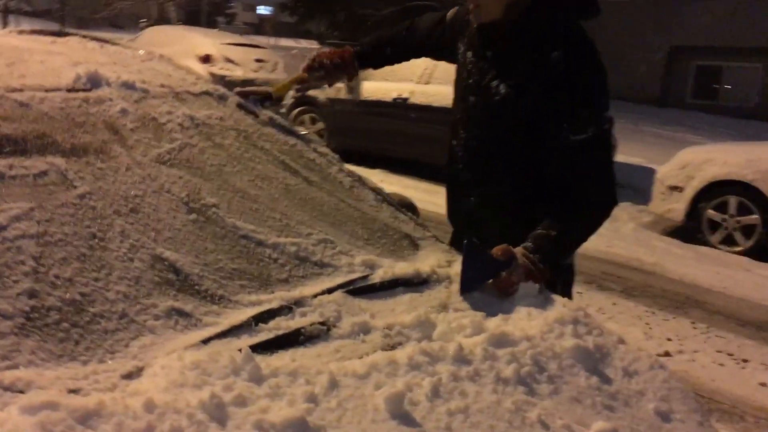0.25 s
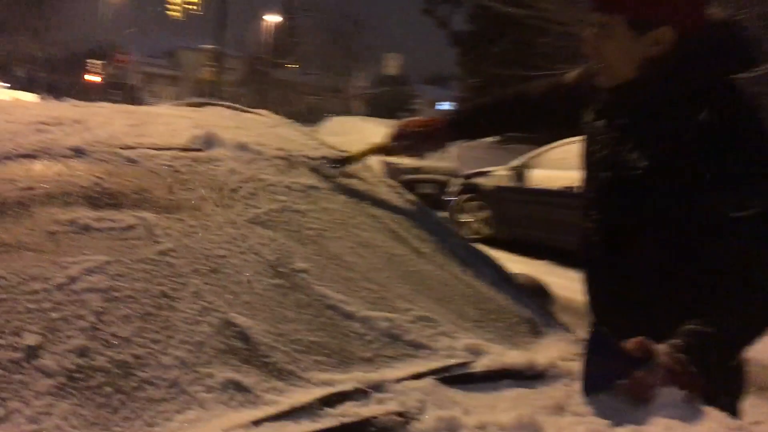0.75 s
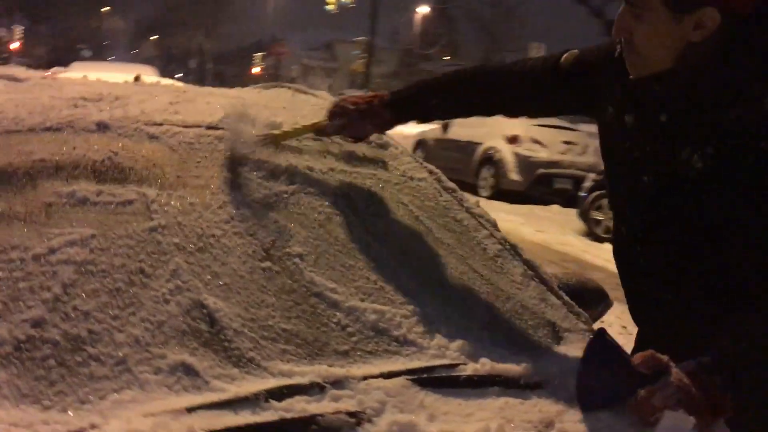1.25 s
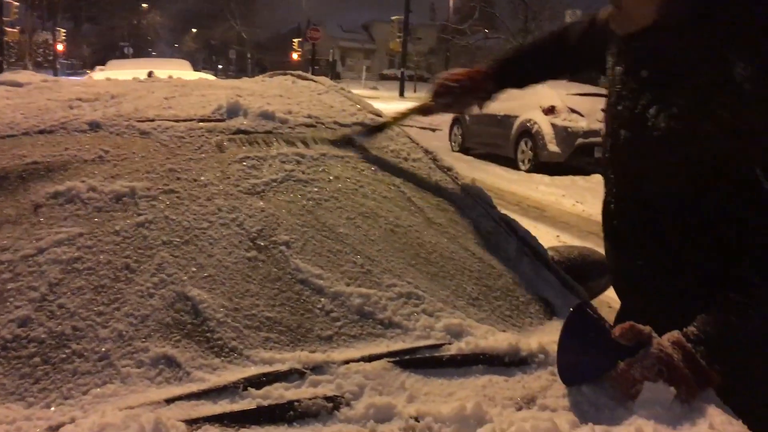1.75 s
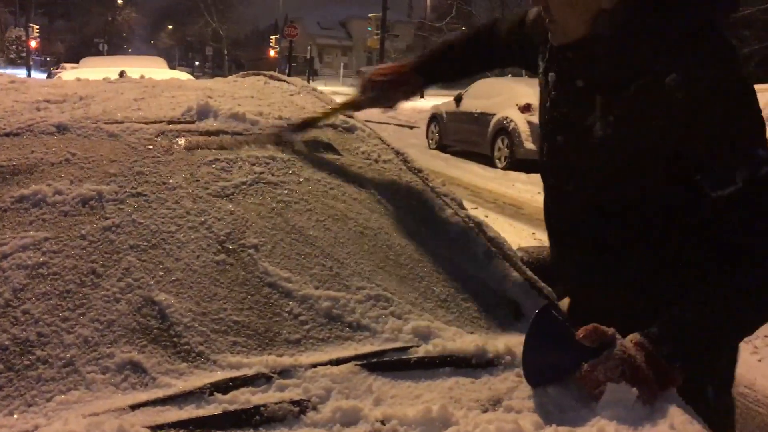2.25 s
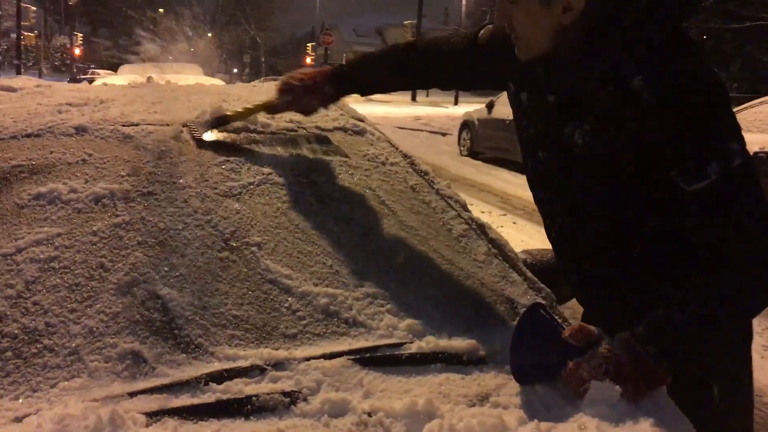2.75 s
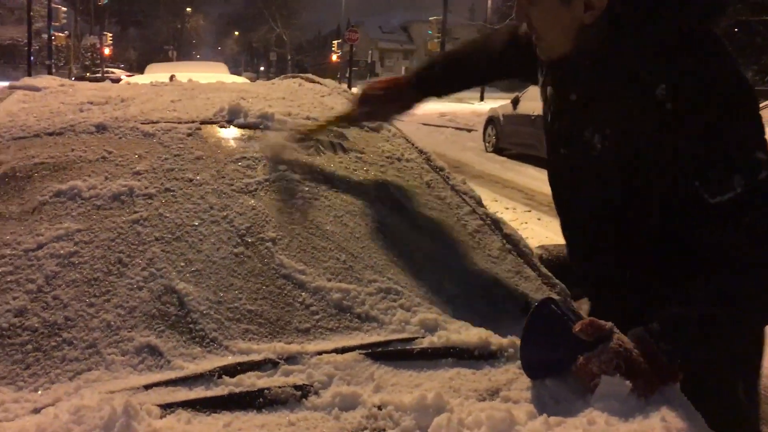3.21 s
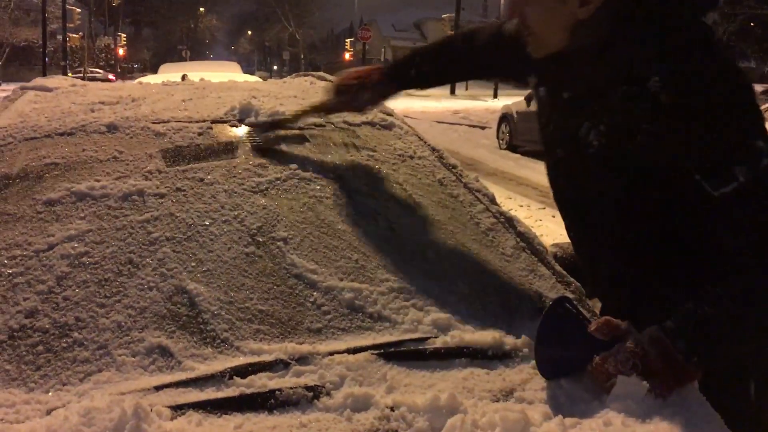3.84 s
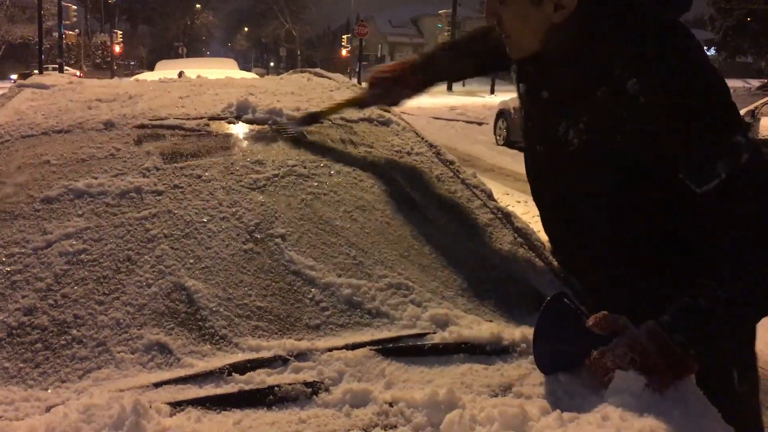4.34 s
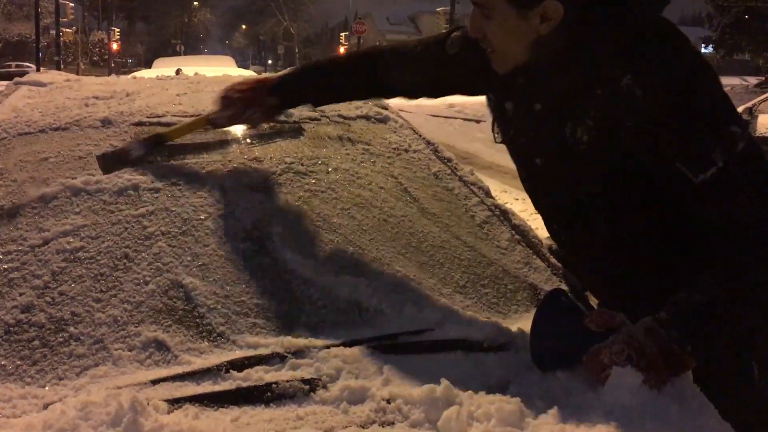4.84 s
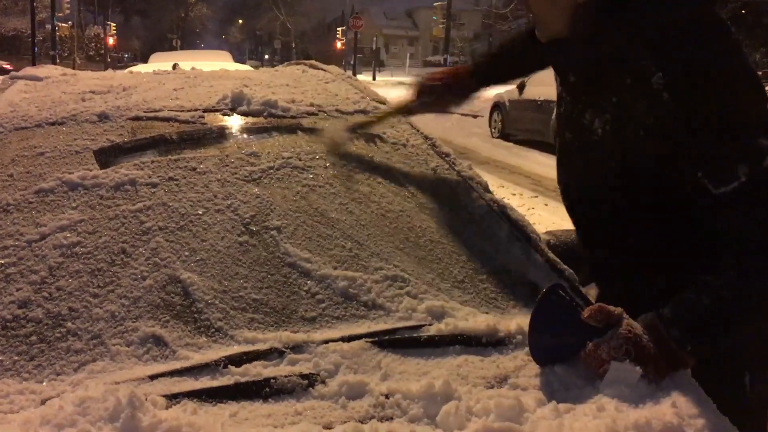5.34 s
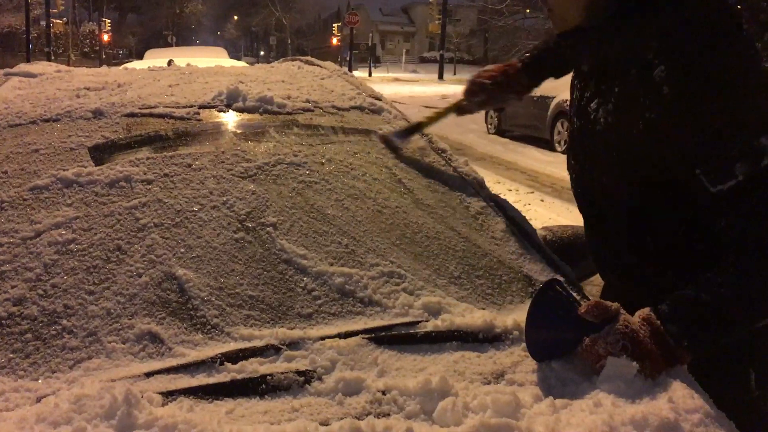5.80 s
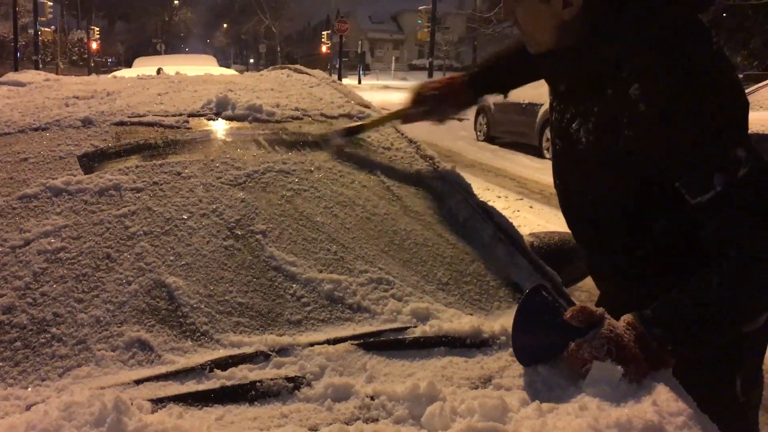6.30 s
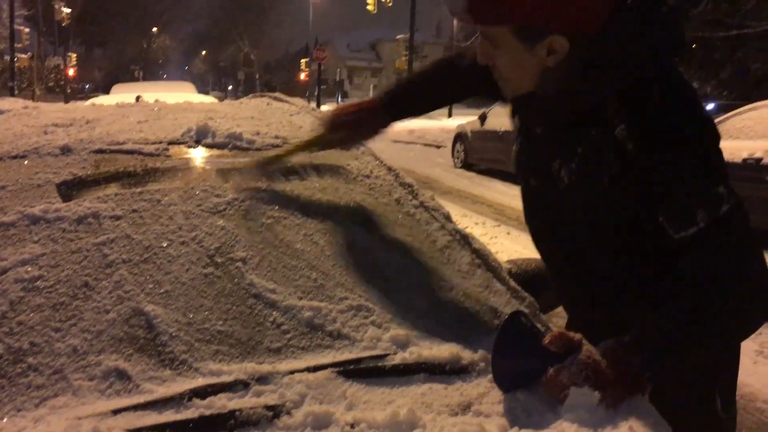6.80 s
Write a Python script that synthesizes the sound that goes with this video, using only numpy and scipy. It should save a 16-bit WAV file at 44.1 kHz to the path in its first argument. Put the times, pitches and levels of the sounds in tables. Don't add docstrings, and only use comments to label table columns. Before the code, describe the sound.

Rapid ice scraping heard by a microphone right beside the glass. An early hard knock leads into rough, crackling strokes with ringing ice chips and low thumps of the windscreen. Strokes grow more separate, with looser taps and near pauses as the blade skips back, followed by another dense run of crunches. The street is still, with slight dull echoes and a faint distant hum.

```python
import sys
import numpy as np
from scipy import signal
from scipy.fft import rfft, irfft
from scipy.io import wavfile
from scipy.ndimage import uniform_filter1d

SR = 44100
rng = np.random.default_rng(int(sys.argv[2]) if len(sys.argv) > 2 else 0)


def wav_out(sig):
    wavfile.write(sys.argv[1], SR, np.round(np.clip(np.atleast_2d(sig).T, -1, 1) * 32767).astype(np.int16))


def gain_from_db(level_db):
    decades = np.asarray(level_db, float) / 20
    return 10 ** decades


N = 311346
SLAM_S = 0.408


def rms_one(x):
    return x / np.sqrt(np.mean(x ** 2) + 1e-20)


def drift(rate):
    r = np.exp(-16 * np.pi * rate / SR)
    slow = signal.lfilter([1], [1, -2 * r, r * r], rng.standard_normal(N // 8 + 4002))[4000:]
    return np.interp(np.arange(N) / 8, np.arange(len(slow)), rms_one(slow))


def resonate(x, hz, width):
    r = np.exp(-np.pi * width / SR)
    gain = (1 - r * r) / 2
    return signal.lfilter([gain, 0, -gain], [1, -2 * r * np.cos(2 * np.pi * hz / SR), r * r], x)


def cracks(per_s, spread_db):
    sizes = gain_from_db(spread_db * np.minimum(rng.exponential(1, N), 4.0)) * rng.choice([-1, 1], N)
    return rms_one(sizes * (rng.random(N) < per_s / SR) + 1e-9)


def through(force, modes, wander_db, wander_rate, grain_db, tilt_db=0):
    middle = np.mean(np.log2([mode[0] for mode in modes]))
    rung = 0
    both = np.array([force, rng.standard_normal(N)])
    for k, (hz, width, db) in enumerate(modes):
        swell_db = wander_db * drift(wander_rate) + grain_db * drift(50.6)
        swell_db = swell_db + tilt_db * (np.log2(hz) - middle)
        rung = rung + (-1) ** k * resonate(both * gain_from_db(db + swell_db), hz, width)
    return rung[0] / np.std(rung[1])


def in_time(rows):
    s, *columns = np.transpose(rows)
    return [np.interp(np.arange(N) / SR, s, c) for c in columns]


def grip():
    # start in seconds, length in seconds, crush at full speed in dB,
    # place of full speed from 0 to 1, sharpness of the top in dB.
    strokes = [(-.03, 0.26, -27, 0.59, -2.5), (0.405, 0.28, -25.5, 0, -1.5), (0.679, 0.29, -27, 0.23, -5),
               (0.966, 0.11, -26.5, 0.83, -2.5), (1.064, 0.3, -23.5, 0.13, -1),
               (1.406, 0.25, -25.5, 0.38, -3.5), (1.825, 0.12, -26.5, 0.4, -2), (1.954, 0.12, -27, 0.58, 2),
               (2.082, 0.26, -27, 0.45, 0), (2.53, 0.075, -29, 0.8, 3), (2.602, 0.13, -20.5, 0.3, -2),
               (2.919, 0.076, -43, 0.13, 3.5), (3.119, 0.23, -24.5, 0.68, -1), (3.929, .16, -21, 0.37, 0),
               (4.195, 0.053, -36.5, 0.68, 9.5), (4.915, 0.049, -31, 1, 5), (5.245, 0.23, -24, 0.39, -3.5),
               (5.524, 0.32, -26.5, 0.26, -3), (5.834, 0.17, -34.5, 0, -0.5),
               (5.97, 0.093, -28.5, 0.89, -9), (6.081, 0.2, -27.5, 0.78, -7),
               (6.286, 0.21, -33.5, 0.77, -6.5), (6.506, 0.22, -28.5, 0.5, -7.5),
               (6.716, 0.18, -25, 0.8, -3.5)]
    # start in seconds, length in seconds, crush in dB, sharpness in dB.
    glides = [(0.229, 0.085, -35.5, -9), (0.298, 0.11, -34.5, -4.5), (1.659, 0.045, -37.5, -10),
              (1.721, 0.16, -40.5, -7), (2.352, 0.078, -33.5, -9), (2.732, 0.26, -50.5, -5),
              (6.877, 0.087, -52, -10), (2.952, 0.24, -49, -16), (3.32, 0.12, -43.5, 2),
              (3.545, 0.21, -54, 3), (3.722, 0.7, -53.5, 0), (4.123, 0.14, -45.5, 5),
              (4.569, 0.022, -29.5, -6), (4.646, 0.073, -43.5, 7), (4.697, 0.07, -54, 0),
              (4.847, 0.059, -50, 5), (5.137, 0.1, -36, 1.5), (5.452, 0.078, -35.5, -14)]
    crush_power, dull_when_slow = 0.98, 0.23
    t = np.arange(N) / SR
    power = np.full((2, N), 1e-12)
    moves = [*strokes, *[(s, d, db, .5, sharp) for s, d, db, sharp in glides]]
    for start, length, db, place, sharp_db in moves:
        span = slice(max(round(start * SR), 0), round((start + length) * SR))
        corners_s = start + length * np.array([0, np.clip(place, .05, .95), 1])
        way = np.interp(t[span], corners_s, [0, .5, 1])
        body = np.sin(np.pi * way).clip(0) ** crush_power
        edge = gain_from_db(sharp_db) * body ** (1 + dull_when_slow)
        power[:, span] += (gain_from_db(db) * np.array([body, edge])) ** 2
    return np.sqrt(power)


def contacts():
    # start in seconds, peak in dB, sharpness in dB, length in ms.
    skips = [(3.3874, -18, 1.5, 13.8), (3.4356, -29, -23, 26), (3.5325, -26.5, -15, 11),
             (3.5478, -32, 0, 7.5), (3.5738, -18.5, -13, 13), (3.596, -22, 0, 4.9), (3.6025, -35, -3, 6),
             (3.6215, -16, -6, 7.9), (3.627, -14.5, -10, 5.8), (3.641, -27.5, -2.5, 22),
             (3.674, -19, -13, 21), (3.689, -19.5, -6, 9.7), (3.719, -29, -6, 19), (3.7613, -36, -22, 11),
             (3.7943, -28.5, -16, 29), (3.842, -33, 3, 11), (3.8512, -24, -15, 15), (4.13, -24, -18, 4.1),
             (4.1347, -27.5, 3.5, 12.5), (4.2164, -15, -15, 26), (4.4153, -21, -11.5, 7.4),
             (4.4663, -32, -8, 30), (4.5318, -15.5, -16, 14.7), (4.581, -12.5, -11, 15),
             (4.6637, -15, -10, 13.3), (4.6976, -19, -5, 18), (4.8625, -25, -10, 19),
             (4.8754, -19.5, -15, 6), (5.0472, -16.5, -9.5, 8.3), (5.075, -13.5, -11.5, 10.4),
             (5.1073, -20, -10, 14), (5.1312, -32, -2, 7.3)]
    # start in seconds, peak in dB, sharpness in dB.
    nicks = [(0.34, -8.5, -17), (0.351, -17, -14), (0.378, -21, -13), (0.3944, -18, 1), (0.41, -3, -6),
             (0.6541, -14.5, -18), (0.6731, -12.5, -10.5), (0.7, -15.5, -28), (0.9815, -23, -7),
             (1.0046, -6.5, -8), (1.434, -19.5, 0), (1.758, -17.5, -11.5), (1.796, -19.5, -11),
             (2.092, -30, -6), (2.108, -10, -9.5), (2.3407, -14, -4), (2.457, -33, -6), (2.4753, -21, -7),
             (2.4966, -30, -8), (2.5435, -8, -8), (2.7335, -16, -10), (2.9124, -39, 2), (2.937, -17, -2),
             (3.0346, -21.5, -23), (3.048, -25, -16), (3.075, -34, -14), (3.1183, -21, -21),
             (3.1323, -15.5, -8), (3.938, -20.5, 5), (4.9163, -24.5, 1), (5.146, -16, -10)]
    # start in seconds, peak in dB, sharpness in dB.
    ridges = [(0.479, -13, -7), (0.5963, -13.5, -11), (0.762, -11, -26), (1.0234, -9, -2.5),
              (1.081, -15, 0), (1.1526, -14, -20), (1.248, -5.5, -6), (1.2925, -9.5, -2.5),
              (1.333, -22, -7), (1.8539, -8.5, -6.5), (2.006, -13.5, -1), (2.308, -9.5, -14),
              (2.552, -10.5, 1), (2.582, -16, -1), (2.6102, -6, -6), (2.9455, -7, -12.5),
              (3.181, -12, -0.5), (3.2255, -7, -5), (3.9548, -20, 11), (4.94, -8.5, -2), (5.176, -18, -14),
              (5.2724, -9, -8.5), (5.701, -9.5, -7), (5.7823, -12, -23), (5.854, -6, -15),
              (6.3273, -17, -20), (6.373, -18, -18), (6.403, -10.5, -21), (6.871, -11.5, -4),
              (5.922, -24, -3), (5.941, -24, -6), (6.339, -19, -17)]
    # start in seconds, peak in dB, sharpness in dB.
    snaps = [
        (1.498, -11.5, -18),
        (2.283, -2.5, -12),
        (2.377, -7, -15),
        (5.649, -5.5, -7),
    ]
    # start in seconds, peak in dB, sharpness in dB.
    catches = [(0.051, -15.5, -22), (0.08, -10.5, -14), (0.12, -19, -1), (0.135, -14.5, -7),
               (0.182, -14.5, -19), (0.451, -13, -15), (0.505, -26, -16), (0.527, -14, -21),
               (0.546, -11, -11), (0.558, -11.5, -4), (0.574, -14, -8), (0.797, -11.5, -17),
               (0.86, -11, -21), (0.879, -14, -12), (0.912, -25, -6), (1.051, -15, -7), (1.133, -6, -4.5),
               (1.179, -5.5, -6.5), (1.209, -16, -7.0), (1.231, -12.5, -6.0), (1.27, -16.5, 2),
               (1.472, -23, -24), (1.526, -21.5, 5), (1.569, -12.5, -27), (1.648, -24, -24),
               (1.682, -36, -21), (1.875, -17, -4), (1.893, -13.5, -18), (1.914, -13.5, -18),
               (1.923, -12, -11), (1.943, -14.5, -8), (1.954, -17, -13.0), (1.968, -14, -6.5),
               (1.986, -21, 1), (2.012, -11.5, -8), (2.145, -23, 5), (2.234, -10.5, -4), (2.3, -7.5, -10.5),
               (2.402, -32, -2), (2.514, -36, -2), (2.633, -11.5, -1), (2.677, -7.5, -4), (2.814, -41, 1),
               (3.093, -33, -11), (3.155, -13, -12), (3.2, -23, -6.0), (3.209, -13, -5), (3.236, -3, -5),
               (3.261, -8.5, -4), (3.296, -22, -11), (3.305, -6.5, -8), (3.345, -21.5, -12),
               (3.376, -23, -12), (3.465, -39, -25), (3.562, -40, -7), (3.613, -39, 5)]
    # start in seconds, peak in dB, sharpness in dB.
    late_catches = [(3.988, -16, 5), (4.018, -14, -11), (4.042, -9, -15), (4.079, -33, -19.0),
                    (4.146, -24, -16), (4.608, -38, -9), (4.649, -31, -9), (4.69, -27.0, 2),
                    (5.001, -34, -9), (5.155, -25.5, -2), (5.211, -22, -15.0), (5.304, -11, -4),
                    (5.325, -20, 5), (5.363, -14, 0.5), (5.379, -16.5, 3), (5.386, -13, -6),
                    (5.395, -7, -9), (5.424, -14.5, -6), (5.487, -21, -8), (5.544, -23, -26),
                    (5.598, -13, -23), (5.613, -20.5, -1), (5.623, -9, -3), (5.635, -14, -3),
                    (5.727, -14.5, -4), (5.667, -13, -4), (5.676, -19, 0), (5.712, -13.5, -8),
                    (5.737, -10.5, -6), (5.775, -13.5, -11), (5.868, -15, -14.0), (5.892, -13, -4),
                    (5.908, -14, -6), (5.958, -27.5, 0), (5.983, -17, -13), (6, -16.5, -8), (6.012, -14, 1),
                    (6.034, -9.5, -7), (6.11, -29, -2), (6.13, -14, -8.5), (6.155, -15.5, -23),
                    (6.183, -13.5, -27), (6.22, -12, -22), (6.24, -12, -20), (6.305, -17, -15),
                    (6.418, -15.5, 0.5), (6.44, -13.5, -13), (6.549, -20, -13), (6.579, -21, -15),
                    (6.622, -11, -32), (6.733, -19, -5), (6.76, -26, -9), (6.777, -22, -13),
                    (6.787, -12, -8), (6.812, -10.5, -7), (6.844, -7.5, -9)]
    rows = list(skips)
    for table, length_ms in [(nicks, 9.9), (ridges, 16), (snaps, 6.1), (catches, 11.2), (late_catches, 11.2)]:
        rows += [(*row, length_ms) for row in table]
    return rows


def bites(rows):
    out = np.zeros((2, N + 2000))
    t_ms = np.arange(2000) / SR * 1000
    for s, peak_db, sharp_db, ms in rows:
        shape = np.sin(np.pi * np.clip(t_ms / max(ms, 1), 0, 1) ** 0.39) ** 1.8
        i = max(round((s - .0018) * SR), 0)
        out[:, i:i + 2000] += gain_from_db([[peak_db - 11.5], [peak_db + sharp_db - 6.5]]) * shape
    return out[:, :N]


def stick():
    stick_ms, from_db, db_per_db = 3.2, -36, 0.06
    loss_db = np.zeros(N)
    pause = np.hanning(round(stick_ms * SR / 1000))
    for s, peak_db, *_ in contacts():
        i = round(s * SR) - len(pause)
        loss_db[i:i + len(pause)] += db_per_db * max(peak_db - from_db, 0) * pause
    return gain_from_db(-loss_db)


def forces(crush):
    trickle_db, fall_db_per_s, trickle_sharp_db = -23, 38, 4
    treble_fall = 4.5
    chatter_db = 27
    crush_db = 20 * np.log10(crush[0])
    fall = fall_db_per_s * np.arange(N) / SR * [[1], [treble_fall]]
    held_db = np.maximum.accumulate(crush_db + fall, axis=1) - fall
    trickle = gain_from_db(held_db + trickle_db) * gain_from_db([[0], [trickle_sharp_db]])
    slip = gain_from_db(1.07 * drift(77) + 2.35 * drift(160) - 2.5)
    chatter = gain_from_db(chatter_db * thumps())
    return np.hypot(bites(contacts()), slip * np.hypot(stick() * chatter * crush, trickle))


def cores():
    core_db, core_sharp_db, place = 0.5, 7.5, .15
    out = np.zeros((2, N))
    for s, peak_db, sharp_db, ms in contacts():
        i = round((s + place * ms / 1000) * SR)
        out[:, i] = gain_from_db([peak_db + core_db, peak_db + sharp_db + core_sharp_db])
    return out


def scrape(body_force, edge_force, tilt_db):
    # frequency in Hz, width in Hz, level in dB.
    body_modes = [(888, 346, -3), (1300, 350, -0.5), (1640, 484, 0.5), (2410, 385, -1), (3254, 660, 0),
                  (4150, 600, 1.5)]
    # frequency in Hz, width in Hz, level in dB.
    edge_modes = [(5100, 1400, -1.5), (5760, 6200, -0.5), (7670, 5850, 4), (9540, 390, 2.5),
                  (11830, 1960, 3.5), (12720, 2440, 4), (14500, 950, 1.5), (16440, 690, 1.5)]
    ice = cracks(per_s=15000, spread_db=4.5)
    body_core, edge_core = cores()
    body = through(ice * body_force + body_core, body_modes, wander_db=2.1, wander_rate=25.0, grain_db=2.5,
                   tilt_db=2.0 * tilt_db)
    edge = through(ice * edge_force + edge_core, edge_modes, wander_db=1.0, wander_rate=29.0, grain_db=1.5)
    splinters = cracks(per_s=6000, spread_db=11.0) * np.sqrt(body_force * edge_force)
    bare = signal.sosfilt(signal.butter(1, [1100, 9000], "band", fs=SR, output="sos"), splinters)
    return gain_from_db(-1.0) * body + edge + gain_from_db(-3.5) * bare


def sings(force):
    # start in seconds, length in seconds, pitch in Hz, level over the crush in dB.
    steady = [(0.731, 0.12, 1420, 20), (2.565, 0.04, 1880, 23), (3.609, 0.032, 2020, 22.5),
              (5.163, 0.069, 1330, 23.5), (5.558, 0.091, 1430, 18), (5.58, 0.12, 3100, 14.5),
              (0.042, 0.092, 803, 16.5), (0.451, 0.057, 630, 19), (0.546, 0.09, 792, 23.5),
              (1.05, 0.057, 1670, 16), (1.22, 0.13, 4360, 15), (1.48, 0.13, 3080, 14.5),
              (2.174, 0.14, 4570, 12.5), (2.626, 0.048, 1130, 18), (2.577, .12, 4150, 17),
              (3.158, 0.08, 4140, 15.5), (3.175, 0.12, 820, 8), (3.95, 0.062, 4250, 13.5),
              (3.952, 0.079, 1130, 12), (4.928, 0.028, 1100, 9), (5.6, 0.09, 7300, 12.5),
              (6.394, 0.016, 1620, 19), (2.6, 0.045, 2200, 17.5), (6.835, 0.035, 2350, 13),
              (0.671, 0.018, 3820, 18), (0.383, 0.024, 3480, 28), (4.527, .03, 1740, 19),
              (5.035, .025, 1490, 22), (5.094, 0.035, 1300, 23)]
    # start and length in seconds, first and last pitch in Hz, level over the crush in dB.
    climbs = [
        (0.368, 0.24, 3560, 4130, 15.5),
        (0.862, 0.16, 1230, 1430, 19),
        (0.984, 0.22, 3100, 4200, 14.5),
    ]
    rings = [(s, d, hz, hz, db, 0.061) for s, d, hz, db in steady]
    rings += [(*row, 0.13) for row in climbs]
    ice = cracks(per_s=5000, spread_db=3.5) * force
    t, out = np.arange(N) / SR, 0
    for start, length, from_hz, to_hz, db, share in rings:
        way = np.clip((t - start) / length, 0, 1)
        turn = np.exp(2j * np.pi * np.cumsum(from_hz + (to_hz - from_hz) * way) / SR)
        r = np.exp(-np.pi * share * from_hz / SR)
        push = gain_from_db(db) * np.sin(np.pi * way) * ice
        out = out + 2 * np.real(turn * signal.lfilter([1 - r], [1, -r], push / turn + 1e-18))
    return out


def chips(force):
    ice = cracks(per_s=1800, spread_db=3.5) * force
    dealt = rng.integers(0, 24, N)
    pitches = np.geomspace(1300, 9000, num=24)
    rung = sum(resonate(ice * (dealt == k) + 1e-18, hz, 0.026 * hz) for k, hz in enumerate(pitches))
    return gain_from_db(11.5) * rung


def flakes(force, tilt_db):
    modes = [(hz, 0.026 * hz, 0) for hz in np.geomspace(821, 5290, num=14)]
    ice = cracks(per_s=6000, spread_db=6.0) * force
    return gain_from_db(-13.5) * through(ice, modes, wander_db=0.5, wander_rate=4.3, grain_db=6.0, tilt_db=0.35 * tilt_db)


def slide():
    from_hz, hz_per_s, length_s, width_hz = 570, 1300, .21, 57
    t = np.clip(np.arange(N) / SR - SLAM_S, 0, length_s)
    rough = drift(width_hz) * np.sin(np.pi * t / length_s) ** 0.25
    return gain_from_db(-41) * rough * np.sin(2 * np.pi * (from_hz * t + hz_per_s * t ** 2 / 2))


def thumps():
    # start in seconds, peak in dB, pitch in Hz, time to fall by 60
    # dB in seconds.
    knocks = [(0.112, -28, 66, 0.31), (5.62, -31, 66, 0.27), (0.419, -13, 131, 0.058),
              (0.723, -19, 114, 0.088), (1.314, -15, 114, 0.11), (1.443, -19.5, 111.6, 0.29),
              (2.028, -19, 128, 0.22), (5.43, -17, 108, 0.14), (5.35, -29, 308, 0.12),
              (5.326, -17, 164, 0.1), (5.373, -14, 197, 0.088), (2.115, -14.5, 114, 0.12),
              (2.165, -20.5, 120.8, 0.33), (2.24, -15, 110, 0.15), (2.704, -15, 131.3, 0.15),
              (2.945, -18.5, 114, 0.12), (3.163, -25, 158, 0.11), (3.234, -26.5, 115, 0.52),
              (3.63, -18, 121, 0.072), (3.97, -29, 140, 0.36), (4.231, -10.5, 112, 0.071),
              (4.591, -12, 119, 0.094), (4.954, -16.5, 123, 0.082), (5.387, -21, 142, 0.18),
              (5.562, -20, 114, 0.11), (5.866, -28, 141, 0.09), (6.141, -29, 105, 0.22),
              (6.3, -25, 312, 0.12), (5.16, -33, 267, 0.18), (6.628, -20.5, 119, 0.12),
              (6.79, -15, 173, 0.094), (6.882, -13.5, 120, 0.095)]
    t, out = np.arange(SR // 4) / SR, np.zeros(N)
    for s, peak_db, hz, t60 in knocks:
        swell = (1 - np.exp(-t / 0.008)) ** 2 * gain_from_db(-60 * t / max(t60, .03) + 2.5)
        i = round(s * SR)
        out[i:i + len(t)] += (gain_from_db(peak_db) * swell * np.sin(2 * np.pi * hz * t))[:N - i]
    return out


def pane(force, pane_db, frame_db):
    # frequency in Hz, width in Hz, level in dB.
    glass_modes = [(65, 27, -9.5), (133, 19.8, 0.5), (194, 17.7, -6.5)]
    # frequency in Hz, width in Hz, level in dB.
    frame_modes = [(185, 70, -4.5), (228.4, 31, 1), (319, 33, 5.5), (525, 63, -8.5), (740, 254, -7)]
    slam_modes = [(478, 74, -4), (573, 110, -9.5), (795, 130, -22)]
    slam_db, slam_t60_s = -18.5, 0.19
    t = np.arange(N) / SR
    drag = rng.standard_normal((2, N)) * gain_from_db(2.45 * drift(17.0) - 0.5)
    slam = (t > SLAM_S) * gain_from_db(slam_db - 60 * np.abs(t - SLAM_S) / slam_t60_s)
    push = uniform_filter1d(force, size=600)
    glass_push = drag[0] * push * gain_from_db(pane_db)
    frame_push = drag[1] * push * gain_from_db(frame_db - 3.0)
    out = through(glass_push, glass_modes, wander_db=0.0, wander_rate=35, grain_db=-3.0)
    out += through(frame_push, frame_modes, wander_db=0.9, wander_rate=2.2, grain_db=0.0)
    out += through(drag[0] * slam, slam_modes, wander_db=1.5, wander_rate=6.8, grain_db=3.0)
    return out + thumps()


def yard(x):
    dull = signal.sosfilt(signal.butter(2, 6000, fs=SR, output="sos"), x)
    out = np.zeros(N)
    for ms, db in [(11.0, -19), (33, -33.0), (81, -53)]:
        lag = round(ms * SR / 1000)
        out[lag:] += gain_from_db(db) * dull[:-lag]
    return out


def frost():
    dust = cracks(per_s=1200, spread_db=4.0) * gain_from_db(3.0 * drift(25.0))
    return gain_from_db(-63) * signal.sosfilt(signal.butter(2, 3000, "high", fs=SR, output="sos"), dust)


def night():
    # frequency in Hz, level per Hz in dB.
    spectrum = [(18, -54), (30, -0.5), (98, -0.5), (259, -14), (437, -15.5), (526, -22.5), (962, -27),
                (3870, -31), (7470, -64), (14800, -80), (16000, -50)]
    hz, db = np.transpose(spectrum)
    f = np.maximum(np.fft.rfftfreq(N, 1 / SR), 1)
    colour = gain_from_db(np.interp(np.log(f), np.log(hz), db))
    hum = irfft(rfft(rng.standard_normal(N)) * colour, N)
    return gain_from_db(-49.5 + 1.0 * drift(1.0)) * rms_one(hum)


def scene():
    # time in seconds, force into the pane in dB, force into the frame in dB,
    # steepness that brightens the ring in dB.
    hold = [(.1, -9.5, -2.5, -0.5), (.5, -10.5, -7, -0.5), (.83, -8.5, -6, 1), (1.15, -8, -5.5, -1),
            (1.52, -10, -6.5, 0), (1.95, -8, -4, 0.1), (2.2, -10, -14.5, -1.5), (2.63, -9.5, -9.5, 0),
            (3.25, -8.5, -6, -1), (4.0, -8, -17, 0), (4.6, -28, -15, -0.8), (4.96, -18, -32, 0),
            (5.12, -3, -2.5, 0.5), (5.38, -15, -3, -0.9), (5.65, -8.5, -15.5, -0.5), (5.95, -6, -2.5, 0),
            (6.3, -3.5, -10.5, -0.5), (6.85, -6, -6, -1)]
    body_force, edge_force = forces(grip())
    pane_db, frame_db, tilt_db = in_time(hold)
    limit = gain_from_db(-24.5)
    piece_force = limit * np.tanh(body_force / limit)
    blade = scrape(body_force, edge_force, tilt_db) + sings(body_force) + slide()
    blade = blade + flakes(piece_force, tilt_db) + chips(piece_force)
    around = pane(body_force, pane_db, frame_db) + night() + frost()
    mono = blade + yard(blade) + around
    return np.array([mono, mono])


def band_limit(x):
    return signal.sosfilt(signal.butter(12, 16830, fs=SR, output="sos"), x)


def record(dry):
    # frequency in Hz, width in Hz, depth from 0 to 1.
    mic_dip = (10660, 610, 0.36)
    hz, width, depth = mic_dip
    dipped = dry - depth * resonate(dry, hz, width)
    x = signal.sosfilt(signal.butter(2, 36, "high", fs=SR, output="sos"), dipped)
    rounded = 0.72 * np.tanh(x / 0.73)
    mix = signal.sosfilt(signal.ellip(10, .5, 56, 15780, fs=SR, output="sos"), rounded)
    return band_limit(mix)


dry = scene()
out = record(dry)
wav_out(out)
```